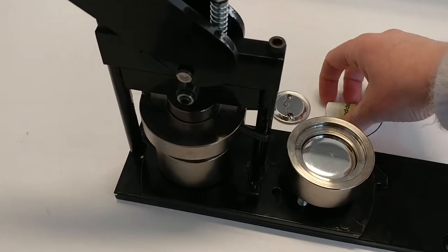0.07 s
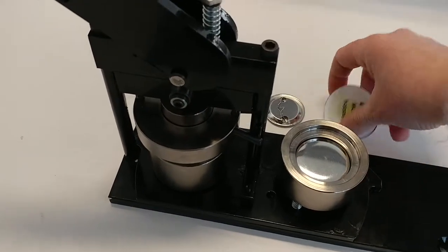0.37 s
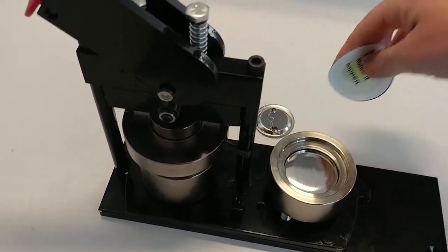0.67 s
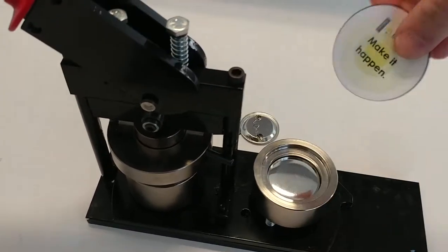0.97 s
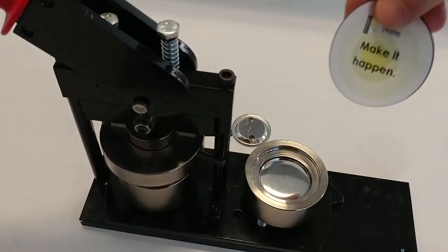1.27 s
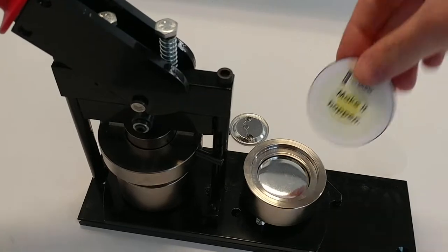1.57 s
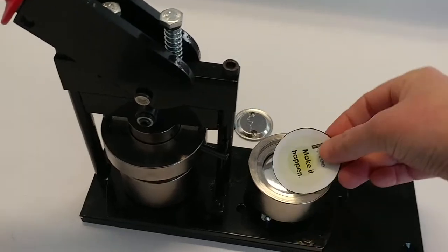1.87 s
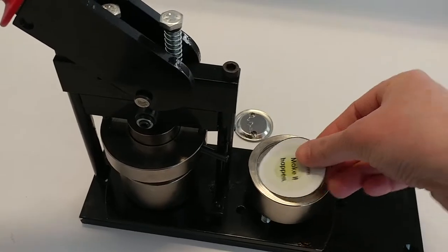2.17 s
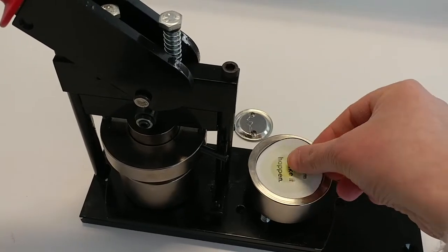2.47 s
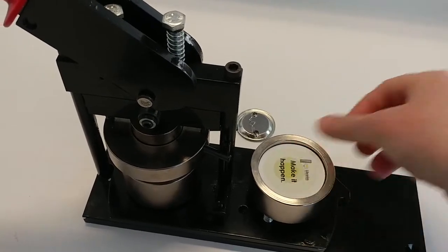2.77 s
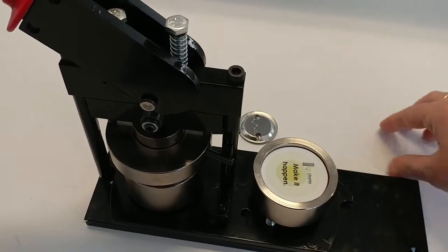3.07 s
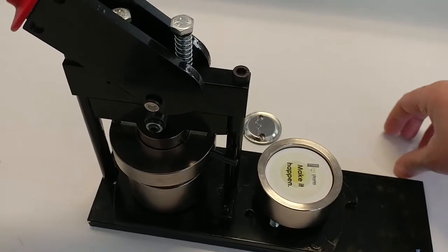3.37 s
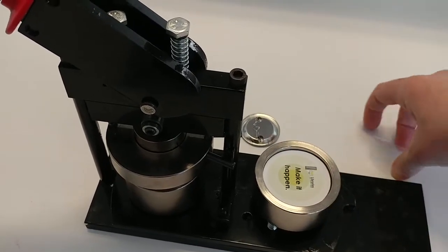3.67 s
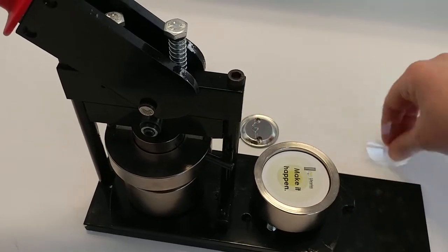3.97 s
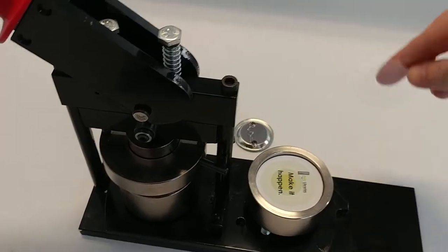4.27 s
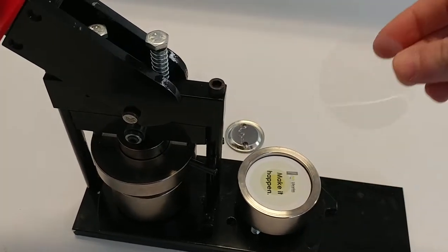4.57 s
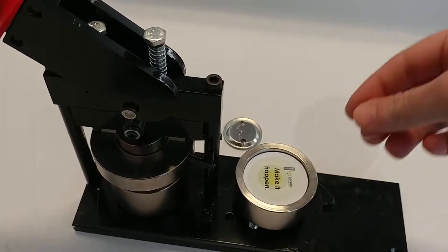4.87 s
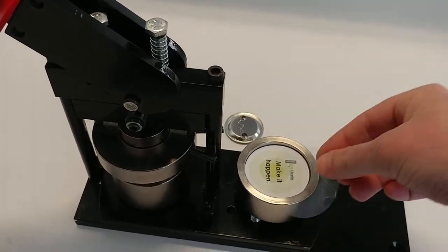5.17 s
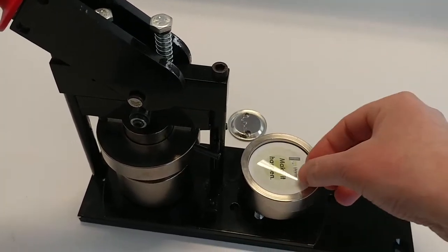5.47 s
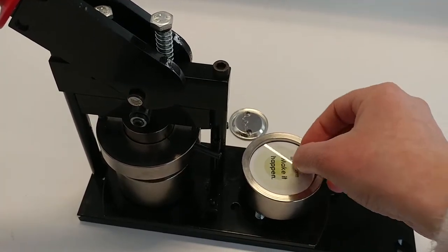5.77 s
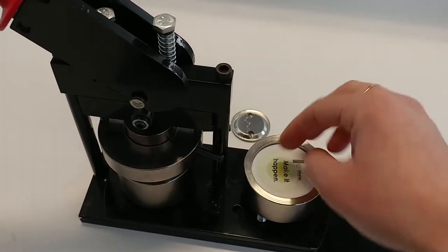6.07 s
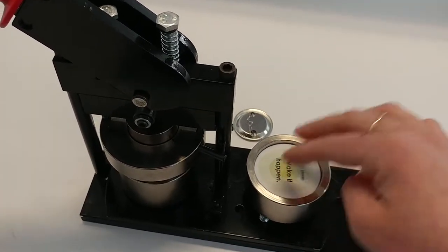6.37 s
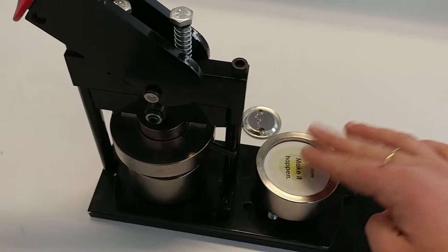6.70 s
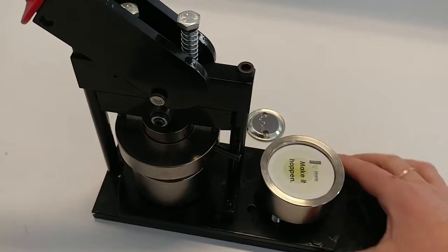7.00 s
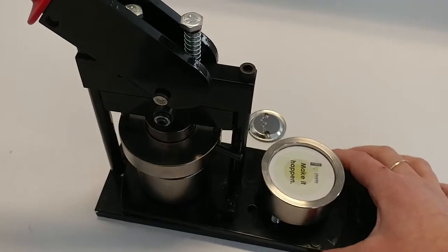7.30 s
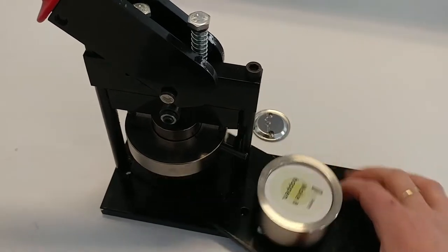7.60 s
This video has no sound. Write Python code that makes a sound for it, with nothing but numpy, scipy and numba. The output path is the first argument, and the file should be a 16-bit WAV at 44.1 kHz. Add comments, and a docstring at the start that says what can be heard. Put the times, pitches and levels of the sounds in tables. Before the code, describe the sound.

A paper disc is slid off a table in short, dry hisses, with sharp flicks at about 0.3 and 0.7 seconds, fading by 1.2. From about 2 to 2.7 seconds its edge scrapes and ticks on the steel rim of a hand press and snaps into the die, the metal ringing very slightly. After a lull, soft finger thuds and brief slides lead to a cluster of crisp clicks around 3.8 seconds as a thin plastic film is picked up. Faint ticks follow. From 5.5 seconds the film scrapes and clicks along the rim, snapping in at 5.9. A fingertip pats it with small crackles at 6.2 and 6.7 seconds, and a few barely audible touches follow until about 7.6. Everything is light and close to the microphone, leaning left, in a small dry room over a faint, low ventilation rumble.

```python
"""Loading a button press

A paper disc, then a clear plastic film, are slid off a table and fitted into a steel die. Friction makes
their edges hiss on the table and scrape on the rim; flicks, snaps into the recess and a fingertip's pats
on the film excite damped bending modes, and the steel rings along. A close microphone with two ports
hears it in a small dry room over a low ventilation rumble."""
import sys
import numpy as np
from scipy import signal
from scipy.fft import rfft, irfft
from scipy.io import wavfile
from scipy.ndimage import uniform_filter1d
from numba import njit

SR = 44100
rng = np.random.default_rng(int(sys.argv[2]) if len(sys.argv) > 2 else 0)


def generate_wav(sig):
    """Save sig (samples, or channels by samples) to the path in sys.argv[1] as 16-bit PCM at SR."""
    pcm = np.round(np.clip(np.atleast_2d(sig).T, -1, 1) * 32767).astype(np.int16)
    wavfile.write(sys.argv[1], SR, pcm)


N = 341334
TIME = np.arange(N) / SR


def edge_flicks():
    """Elastic release: a disc's edge springs free of the fingers and strikes the table."""
    # Each row: start in seconds, level in dB, fade in ms, bending mode in Hz, treble and bass in dB.
    contacts = [(.159, -35, 1.2, 3500, -1, -3.5), (.2185, -33.5, 1.4, 3600, 1.5, -0.5),
                (.263, -13, 2.4, 2240, -2, 2.5), (.2662, -10, 4.8, 8400, 6, 1),
                (.3635, -23, 4.8, 3640, 9, -15), (.3705, -24.5, 4.4, 3600, -4.5, 7),
                (.6565, -18.5, 2.07, 2450, -5.5, 1), (.6655, -16.5, 1.76, 2100, 7.5, 9),
                (3.607, -34, 7.8, 3500, -5, 3), (3.796, -13, 3.2, 2150, 4, -0.5),
                (3.8037, -17, 2.6, 8600, 3, -12.5), (3.8105, -16.5, 3.5, 3500, 0.5, -1.5),
                (3.833, -12, 1.84, 3500, 6, -4.5), (3.871, -18.5, 7.5, 3600, 0.5, 8.5),
                (4.0485, -32.5, 3.7, 2900, -6, 6.5)]
    # Each row: frequency in Hz, gain in dB.
    tone = [(100, -28), (400, -27.5), (750, -23), (1300, -10.5), (2050, -8), (3500, 1.5), (4400, -1),
            (5200, -2.5), (7000, -7.5), (8100, 4.5), (9200, 6.5), (10500, -13.5), (12500, -4), (15500, -15)]
    return clicks(contacts, tone, flex_db=6.5, flex_width_hz=230,
                  likeness=.65, lag_ms=.11, rise_share=.18, crack_ms=.62)


def die_snaps():
    """Impact excitation: a disc ticks on the rim, catches or snaps into the die."""
    # Each row: start in seconds, level in dB, fade in ms, bending mode in Hz, treble and bass in dB.
    contacts = [(2.1965, -37, 2.9, 3760, -13, 2), (2.2675, -24.5, 3.7, 3320, -24, -6),
                (2.2745, -27, 1.8, 3250, -9, 0), (2.3075, -21.5, 1.9, 3395, 8.5, -7.5),
                (2.4032, -44.5, 0.99, 3330, -19, 8), (2.4125, -30.5, 4.9, 3520, 7, -5),
                (2.5125, -23.5, 3.1, 3200, 9, -1), (2.5548, -26, 2.8, 4100, 2, -3),
                (2.5803, -24.5, 0.88, 4330, 22, -4), (2.62, -17.5, 2, 3300, 5, 5.5),
                (2.6272, -25, 2.1, 3500, 2, -3), (2.6383, -32.5, 4.5, 3900, 5, 12),
                (2.7035, -42, 2, 7640, -9, -4), (4.862, -59, 2.5, 8840, 7, -8),
                (4.911, -63.5, 1.94, 8800, 9, -4), (5.3405, -54.5, 3.5, 3160, 15, 7),
                (5.4207, -58, 3.2, 3000, 19, -5), (5.4572, -54.5, 2.7, 3000, 14, 6),
                (5.4833, -40, 1.68, 3140, -2, 3), (5.5215, -29, 1.35, 3160, -1.5, -4),
                (5.7515, -32, 2.3, 3030, -10, 0.5), (5.792, -29.5, 1.9, 3000, 11, 5),
                (5.8415, -29, 2.1, 3220, 8, -8), (5.8606, -24.5, 1, 3250, 15, -4),
                (5.9055, -26, 5, 3200, 12, -3), (5.913, -15, 1.341, 3674, -13, -6),
                (5.9272, -31, 0.91, 3270, -15, 3)]
    # Each row: frequency in Hz, gain in dB.
    tone = [(100, -12.5), (300, -16.5), (800, -20), (1900, -16), (2700, -2.5), (3200, -2), (4300, -2),
            (5200, -11), (6100, -4.5), (7300, -13), (8900, 4), (10600, -15), (12500, -10), (15500, -23.5)]
    return clicks(contacts, tone, flex_db=13, flex_width_hz=400,
                  likeness=.6, lag_ms=.0064, rise_share=.5, crack_ms=.51)


def film_pats():
    """Flexure under a fingertip: a dull landing, then a crackle and a softer rustle as the film gives."""
    # Each row: start in seconds, level in dB, treble in dB.
    pats = [(6.24, -24, 7.5), (6.56, -62, 4.5), (6.702, -28.5, 1), (7.1635, -53, -7.5), (7.3987, -60, -5),
            (7.589, -61, -10)]
    # Each row: delay in seconds, level in dB, fade in ms, bending mode in Hz, treble and bass in dB.
    parts = [(0, 0.5, 2.945, 2970, -10, -4.5), (.006, -3.5, 3.2, 3122, 8, 8.5),
             (.014, -15.5, 5, 3245, 0, 9)]
    # Each row: frequency in Hz, gain in dB.
    tone = [(100, -17.5), (800, -17.5), (2000, -11.5), (2850, 5.5), (3300, -4), (4300, -3), (5200, -11),
            (6100, -9.5), (7300, -18), (8900, 1), (10600, -18.5), (12800, -9), (15500, -18)]
    contacts = [(start_s + delay_s, db + part_db, fade_ms, flex_hz, treble_db + part_treble_db, bass_db)
                for start_s, db, treble_db in pats
                for delay_s, part_db, fade_ms, flex_hz, part_treble_db, bass_db in parts]
    return clicks(contacts, tone, flex_db=13, flex_width_hz=480,
                  likeness=.53, lag_ms=.0097, rise_share=.396, crack_ms=.38)


def table_slides():
    """Sliding friction: discs and fingers hiss over the fine grain of the table or of each other."""
    # Each row: start, length and rise in seconds, level, swell and treble in dB,
    # air pocket resonance in Hz, its gain in dB.
    strokes = [(0, 0.014, .02, -33, -4, 0, 3687, 5.5), (.06, .026, 0.02, -47, 0, 3.5, 3800, 10),
               (.146, 0.01, .022, -34.5, 2, -0.5, 3632, 10), (.208, .046, 0.023, -42.5, 3.5, 1, 3820, 8),
               (.275, .045, 0.027, -38.5, -8.5, 5, 3500, 1), (.35, .055, 0.04, -38.5, -6.5, 2, 3440, -0.5),
               (.43, .07, 0.054, -43.5, -5.5, 0.5, 3100, -6.5),
               (.548, 0.043, 0.079, -36.5, -0.5, 8.5, 2900, -5.5),
               (.61, .045, 0.086, -46.5, -2.5, -0.5, 2900, -9),
               (.675, .06, 0.021, -41.5, -6, 2.5, 2950, -9.5),
               (.778, .023, 0.033, -40, 0.5, -2, 2900, -15.5),
               (.852, .026, 0.09, -42.5, 0.5, 2.5, 2900, -12.5),
               (.965, .06, 0.028, -58.5, -3, -3, 2800, -10),
               (1.055, 0.19, .06, -52.5, -6.5, 8.5, 2810, -12), (1.51, .15, .1, -68.5, 3, 0, 3480, 2.5),
               (1.595, .03, 0.064, -57.5, -1.5, -5, 3510, 2.5), (3.568, .01, .02, -61, 0, 18, 3727, 0),
               (3.608, 0.054, .02, -40.5, -3.5, 4, 3707, 3), (3.755, .03, 0.057, -48, -6, -7.5, 3400, 2),
               (3.8, .068, 0.025, -38, -8, -2.5, 3450, 6), (3.955, .03, .05, -48, -2.5, 6.5, 2900, -12),
               (4.012, .035, .04, -44.5, 0.5, 6.5, 2900, -14.5),
               (4.11, 0.022, .05, -63, 0.5, 13, 2930, -16),
               (4.385, 0.082, 0.064, -62, -0.5, -9.5, 3106, 0.5),
               (7.57, 0.054, .04, -68.5, 0.5, -10, 2806, 6)]
    # Each row: frequency in Hz, gain in dB.
    tone = [(150, -22.5), (750, -19), (1400, -15.5), (2300, -6.5), (3900, -2.5), (5200, -11.5),
            (7200, -10.5), (8100, 2.5), (9300, 1.5), (10400, -19.5), (12000, -11.5), (15500, -15.5)]
    motion = stroke_envelopes(strokes, release_db_per_s=751.5)
    return friction(motion, tone, grain_db=3, catch_db=0, catch_rate=350,
                    pan_db=6.5, likeness=.5033, lag_ms=.11)


def rim_scrapes():
    """Stick-slip friction: a disc's edge catches and lets go along the steel rim."""
    # Each row: start, length and rise in seconds, level, swell and treble in dB,
    # air pocket resonance in Hz, its gain in dB.
    strokes = [(1.928, 0.04, .07, -54.5, -2, 3.5, 4450, 29), (2.085, .047, .08, -46.5, 12, -8, 4150, 14),
               (2.175, 0.11, .035, -46.5, -1, -20.5, 3650, 2.8),
               (2.414, 0.11, .01, -35.5, 2.5, -5, 3450, 14.8), (2.53, .05, .02, -50.5, 0.5, -1, 3500, 3.8),
               (2.596, .036, .03, -32.5, -2, 4.5, 3550, 3.9), (5.47, .16, .1, -63.5, -1, -6, 2950, 8.5),
               (5.638, 0.038, .05, -51.5, 1, 4.5, 2950, 14), (5.71, .035, .05, -50, 7, -1.5, 2994, 5),
               (5.762, 0.041, .035, -33.5, -0.5, 2.5, 3070, 10.4),
               (5.841, 0.011, .012, -30.5, 5, 9, 3177, 8.3), (5.902, .026, .04, -41, -9, -5.5, 3300, 3.4)]
    # Each row: frequency in Hz, gain in dB.
    tone = [(150, -32), (900, -22), (1900, -16.5), (2700, -8), (4200, -6), (5300, -19), (6200, -13),
            (7300, -19.5), (8600, 1.5), (9500, -4), (10600, -22), (13000, -13.5), (14500, -21.5),
            (15800, -32)]
    motion = stroke_envelopes(strokes, release_db_per_s=900)
    return friction(motion, tone, grain_db=0, catch_db=2.5, catch_rate=340,
                    pan_db=8.5, likeness=.61, lag_ms=.0078)


def finger_thuds():
    """Soft impact: fingertips land slowly on the table or die, exciting mostly low frequencies."""
    # Each row: start in seconds, level in dB, fade in ms.
    touches = [(0.262, -32.5, 5), (0.365, -45, 7), (2.619, -49, 11), (3.314, -50.5, 22), (3.546, -60, 26),
               (3.605, -45.5, 53), (3.797, -40.5, 24), (3.870, -44.5, 10), (4.754, -48.5, 18),
               (5.211, -56, 8.8), (5.267, -58, 18), (5.912, -49, 9)]
    # Each row: frequency in Hz, gain in dB.
    tone = [(40, 5), (100, -6), (240, 5), (450, 1.5), (1200, -5), (2300, -10.5), (4000, -20.5),
            (12000, -34)]
    out = np.zeros((2, N))
    for start_s, db, fade_ms in touches:
        force = burst(fade_ms, likeness=.21, lag_ms=.023, rise_ms=1.3)
        add(out, start_s, at_level(colour(force, tone), db))
    return out


def clicks(contacts, tone, flex_db, flex_width_hz, likeness, lag_ms, rise_share, crack_ms):
    """Modal ringing: each contact excites one damped bending mode, set by how the disc is held."""
    # The hand moves between the ports. Each row: time in seconds, left minus right level in dB.
    hand_pan = [(.15, 9.5), (.265, 4.5), (.66, 8.5), (2.3, 13), (2.7, 7.5), (3.8, 7), (4.05, 4), (5.5, 8.5),
                (5.91, 14.5), (6.25, 10.5), (7.2, 5)]
    slip_lead_s, slip_db = .0041, -19  # the edge starts to slip just before it lets go
    out = np.zeros((2, N))
    for start_s, db, fade_ms, flex_hz, treble_db, bass_db in contacts:
        pan_db = np.interp(start_s, *np.transpose(hand_pan))
        for part_s, part_db in (start_s, db), (start_s - slip_lead_s, db + slip_db):
            # a longer contact starts more softly and has less of a crack
            force = burst(fade_ms, likeness, lag_ms, rise_share * fade_ms, crack=crack_ms / fade_ms)
            click = colour(force, tone)
            click = click + undb(flex_db) * resonance(click, flex_hz, flex_width_hz)
            click = shelf(click, 5800, treble_db, "high")
            click = shelf(click, 1700, bass_db, "low")
            add(out, part_s, at_level(panned(click, pan_db), part_db))
    return out


def burst(fade_ms, likeness, lag_ms, rise_ms, crack=0, size=4096):
    """Contact force: tiny slips build up and decay, with an optional impulse at their peak."""
    ms = np.arange(size) * 1000 / SR
    swell = (1 - np.exp(-(ms / rise_ms) ** 2)) * np.exp(-ms / fade_ms)
    force = rng.standard_normal((3, size)) * swell
    force[0, np.argmax(swell)] += crack * np.linalg.norm(swell)
    return two_ports(force[0], force[1:], likeness, lag_ms)


def friction(motion, tone, grain_db, catch_db, catch_rate, pan_db, likeness, lag_ms):
    """Roughness noise: an edge crosses uneven bumps, and the air pocket under the disc resonates."""
    db, treble_db, pocket_hz, pocket_db = motion
    pocket_hz = pocket_hz * np.exp(.055 * walk(70))  # the held disc trembles, and the pocket with it
    bumps = undb(grain_db * walk(2500) + catch_db * walk(catch_rate))
    force = rng.standard_normal((3, N)) * bumps
    hiss = colour(two_ports(force[0], force[1:], likeness, lag_ms), tone)
    pocket = np.array([moving_resonance(port, pocket_hz, width_hz=890.) for port in hiss])
    hiss = hiss + undb(pocket_db) * pocket
    # a lighter, faster stroke trades body for treble
    hiss = shelf(hiss, 6000, treble_db + 1.5 * walk(49), "high")
    hiss = panned(hiss, pan_db)
    running_rms = np.sqrt(uniform_filter1d(np.mean(hiss ** 2, axis=0), size=2048))
    return hiss / running_rms * undb(db)


def stroke_envelopes(strokes, release_db_per_s):
    """Incoherent addition: strokes sum in power, and each weights treble and pocket by its share."""
    sag_oct_per_s = .4  # the pocket's resonance falls as the disc closes in
    power, controls = np.zeros(N), np.zeros((3, N))
    for start_s, length_s, rise_s, db, swell_db, treble_db, pocket_hz, pocket_db in strokes:
        since_s = TIME - start_s
        from_middle_s = np.clip(since_s, 0, length_s) - length_s / 2
        rise_db = -30 * since_s / rise_s
        release_db = release_db_per_s * (since_s - length_s)
        fade_db = np.clip(np.maximum(rise_db, release_db), 0, 120)
        share = undb(db + swell_db * from_middle_s / length_s - fade_db) ** 2
        power += share
        controls[0] += share * treble_db
        controls[1] += share * pocket_hz * np.exp2(-sag_oct_per_s * from_middle_s)
        controls[2] += share * pocket_db
    return 10 * np.log10(power), *(controls / power)


def press_ring(x):
    """Sympathetic vibration: the steel press rings briefly along with the discs."""
    # Each row: mode frequency in Hz, bandwidth in Hz, gain in dB.
    modes = [(3280, 100, -5), (3493, 41, -6), (4370, 54, -2), (5320, 25, -1), (6050, 38, -0.5),
             (8330, 40, -2.5), (8688, 90, -7), (9200, 14, -5.5), (9417, 14, -6.5)]
    return x + sum(undb(db) * resonance(x, hz, width_hz) for hz, width_hz, db in modes)


def two_ports(shared, own, likeness, lag_ms):
    """Partial coherence: both ports hear one sound, the left later, plus their own scatter off the press."""
    delay = np.exp(-2j * np.pi * np.fft.rfftfreq(len(shared), 1 / SR) * lag_ms / 1000)
    left = irfft(rfft(shared) * delay, len(shared))
    return np.sqrt(likeness) * np.array([left, shared]) + np.sqrt(1 - likeness) * own


def press_shadow(x):
    """Acoustic shadow: the press partly screens the right port and colours what it hears."""
    # Each row: frequency in Hz, gain in dB.
    right_tone = [(200, 2), (1200, 3.5), (2400, 1.5), (3300, -4.5), (5000, 4.5), (7200, 5.5), (8700, -7),
                  (10500, 3), (12500, 2.5), (15500, 1.5)]
    return np.vstack([x[:1], colour(x[1:], right_tone)])


def room(x, wet_db, t60_s, gap_s):
    """Reverberation: sound spreading sideways (the right channel) returns as a diffuse tail."""
    t = TIME[:SR // 3]
    decay = np.exp(-np.log(1000) * t / t60_s)
    onset = np.clip(t / gap_s, 0, 1) ** 2
    tail = rng.standard_normal((2, len(t))) * decay * onset
    tail = colour(tail, [(200, 5), (2000, 0), (3300, -3), (5000, 0), (9000, -2.5), (15000, 1.5)])
    tail = panned(tail, pan_db=1.5) / np.sqrt(len(t))
    return x + undb(wet_db) * signal.fftconvolve(x[1:], tail, axes=1)[:, :N]


def background():
    """Noise floor: swelling ventilation rumble and hum, alike at both ports, under microphone hiss."""
    # Each row: frequency in Hz, relative spectral density in dB.
    air_tone = [(15, -41), (25, -13), (48, -0.5), (97, -5), (130, -7.5), (200, -7), (270, -14.5),
                (301, -11), (326, -14), (363, -14.5), (734, -25), (4370, -38), (11900, -38), (14400, -39.5),
                (16000, -40.5)]
    # Mains and fan lines. Each row: frequency in Hz, level in dB.
    hum_lines = [(59, -75), (122, -67), (297, -79)]
    side_tone = [(60, -11), (150, -10.5), (300, -7.5), (650, -.5), (1400, -.5), (15000, 1)]
    mid, side = colour(rng.standard_normal((2, N)), air_tone, size=8192)
    side = colour(side[None], side_tone)[0]
    air = np.array([mid + side, mid - side]) / np.std(mid) * undb(-63)
    air = shelf(air, 220, 1.6 * walk(3.7), "low")
    hum = sum(undb(db) * unit(resonance(rng.standard_normal(N), hz, width_hz=7)) for hz, db in hum_lines)
    return air + hum


def colour(x, tone, size=1024):
    """Minimum-phase filter through (Hz, dB) points, built by folding the cepstrum."""
    hz, db = np.transpose(tone)
    bin_hz = np.maximum(np.arange(size // 2 + 1) * SR / size, 1)
    gain = undb(np.interp(np.log(bin_hz), np.log(hz), db))
    cepstrum = irfft(np.log(gain))
    cepstrum[1:size // 2] *= 2
    cepstrum[size // 2 + 1:] = 0
    response = irfft(np.exp(rfft(cepstrum)))
    return signal.fftconvolve(x, response[None], axes=1)[:, :x.shape[1]]


def resonance(x, hz, width_hz):
    """Damped resonator: a two-pole band-pass, gain 1 at the centre."""
    return signal.lfilter(*signal.iirpeak(hz, hz / width_hz, fs=SR), x)


@njit
def moving_resonance(x, hz, width_hz):
    """Time-varying resonator: a state-variable band-pass, gain 1 at its moving centre."""
    y, band, low = np.empty(len(x)), 0., 0.
    for i in range(len(x)):
        tuning, damping = np.tan(np.pi * hz[i] / SR), width_hz / hz[i]
        velocity = (band + tuning * (x[i] - low)) / (1 + tuning * (tuning + damping))
        band, low = 2 * velocity - band, low + 2 * tuning * velocity
        y[i] = damping * velocity
    return y


def shelf(x, hz, db, kind):
    """Zero-phase shelving: raise or lower everything above ("high") or below ("low") hz."""
    band = signal.sosfiltfilt(signal.butter(2, hz, kind, fs=SR, output="sos"), x)
    return x + (undb(db) - 1) * band


def walk(rate):
    """Random modulation of rms 1, interpolated between rate knots a second."""
    knots = rng.standard_normal(N)
    return unit(np.interp(TIME * rate, np.arange(N), knots))


def panned(x, pan_db):
    """Level difference between left and right, at an overall rms of 1."""
    return unit(np.array([unit(x[0]) * undb(pan_db), unit(x[1])]))


def at_level(x, db):
    """Equivalent level: scale a short sound as if its energy fell within 5 ms."""
    return unit(x) * undb(db) * np.sqrt(.005 * SR / x.shape[1])


def add(out, start_s, sound):
    """Superposition: mix a sound in at its start time."""
    start = int(start_s * SR)
    out[:, start:start + sound.shape[1]] += sound[:, :N - start]


def undb(db):
    """Decibels to amplitude ratio."""
    return 10 ** (np.asarray(db) / 20)


def unit(x):
    """Normalisation to rms 1."""
    return x / np.sqrt(np.mean(x ** 2))


def scene():
    """Superposition of the sounds at table and die, their reverberation and the noise floor."""
    table = edge_flicks() + table_slides()  # to the right of the die, so later at the left port
    die = die_snaps() + rim_scrapes() + film_pats()
    near = undb(-1) * press_ring(table + die) + finger_thuds()
    return room(press_shadow(near), wet_db=-16.5, t60_s=.12, gap_s=.02) + background()


def record(dry):
    """Band limiting and clipping: thin the deepest rumble, clip at full scale and cut the top."""
    high_pass = signal.butter(2, 33, "high", fs=SR, output="sos")
    low_pass = signal.ellip(10, .2, 90, 16100, fs=SR, output="sos")
    clipped = np.clip(signal.sosfilt(high_pass, dry), -1, 1)
    return signal.sosfilt(low_pass, clipped)


dry = scene()
out = record(dry)
generate_wav(out)
```